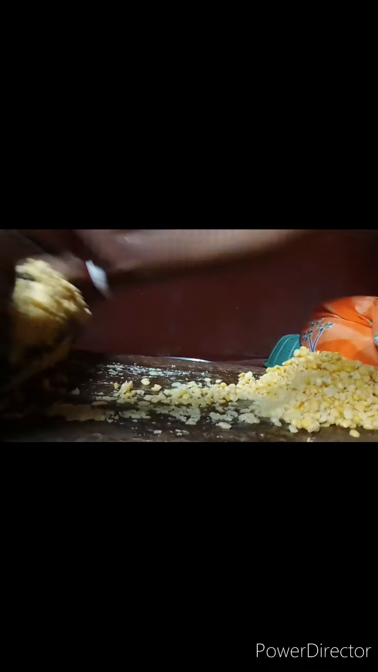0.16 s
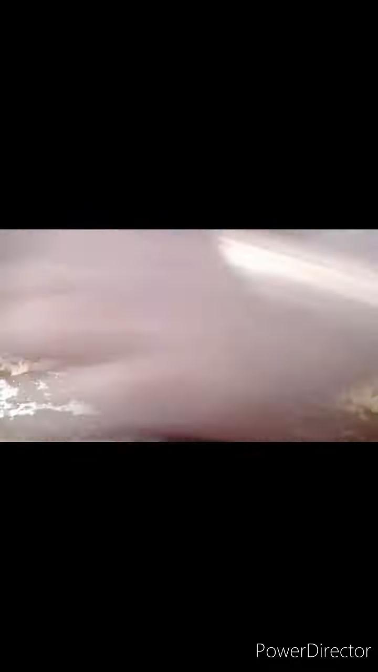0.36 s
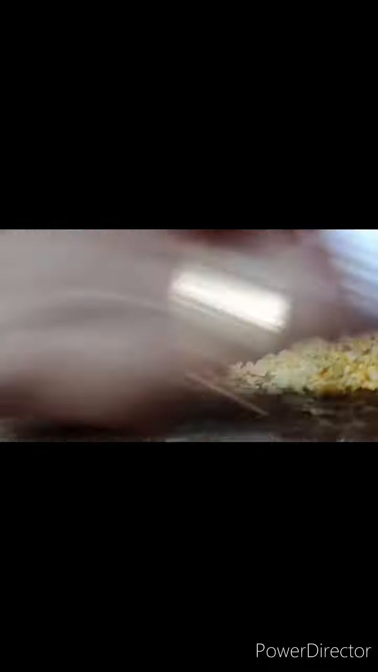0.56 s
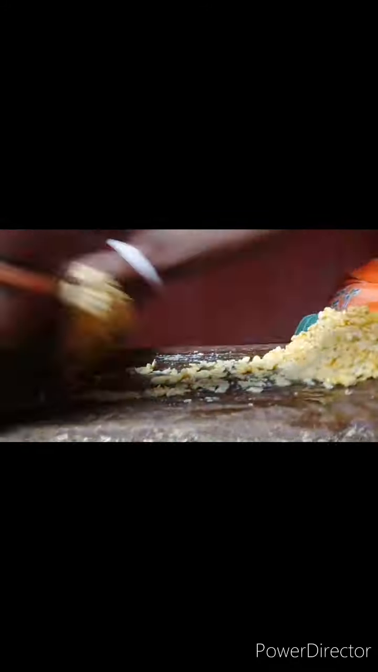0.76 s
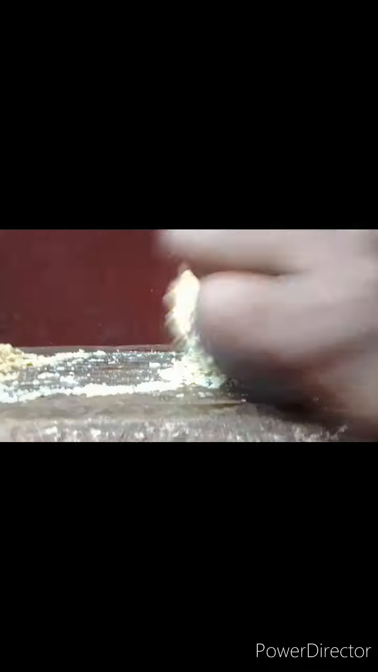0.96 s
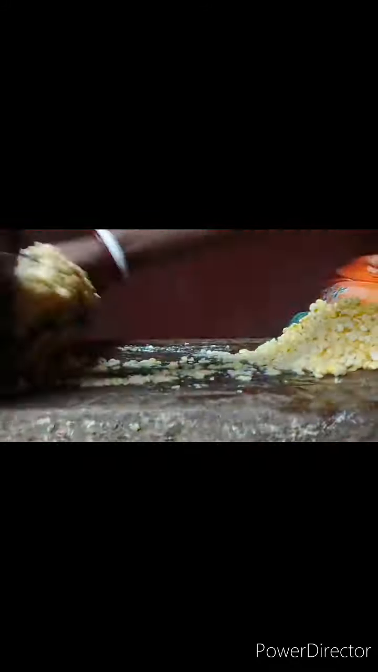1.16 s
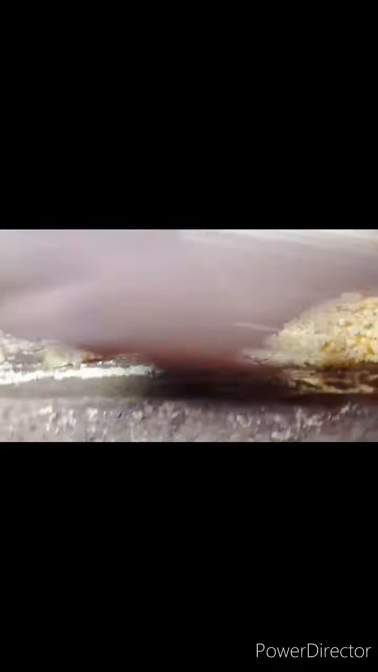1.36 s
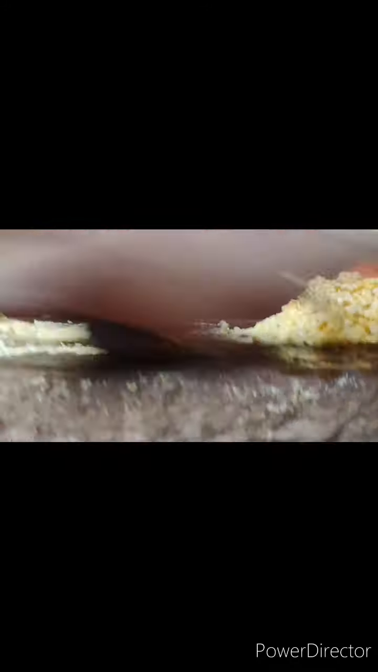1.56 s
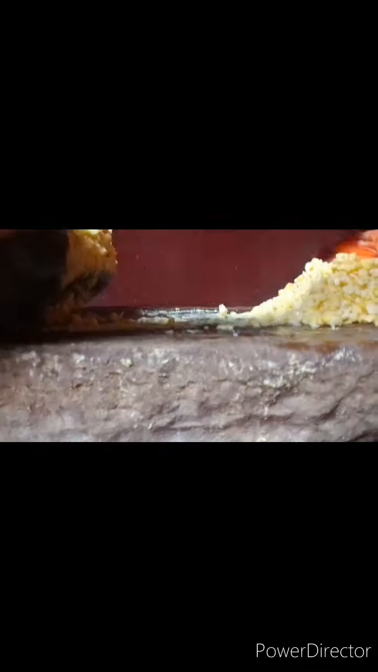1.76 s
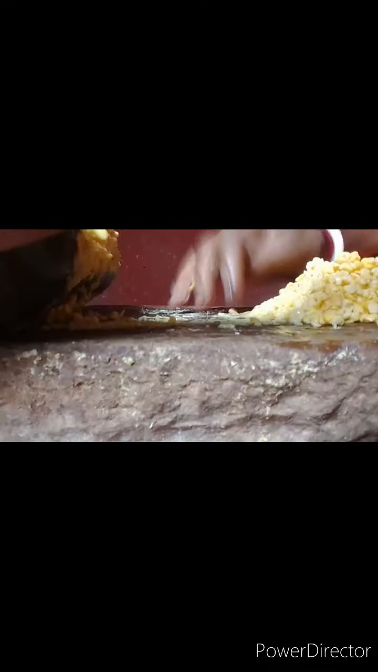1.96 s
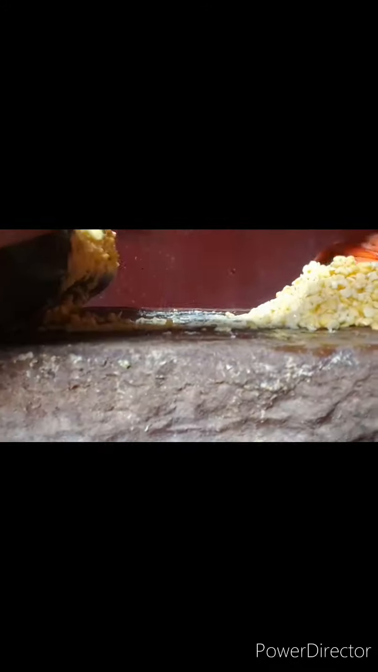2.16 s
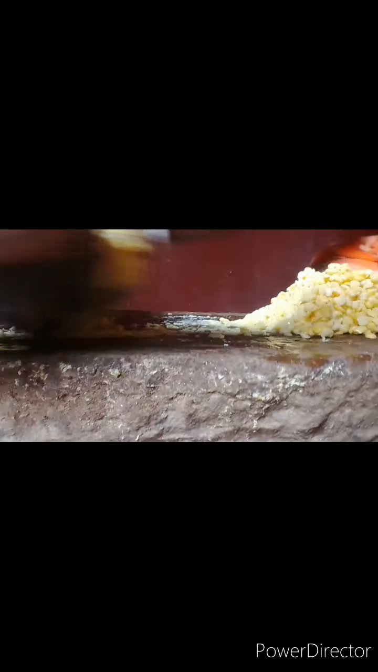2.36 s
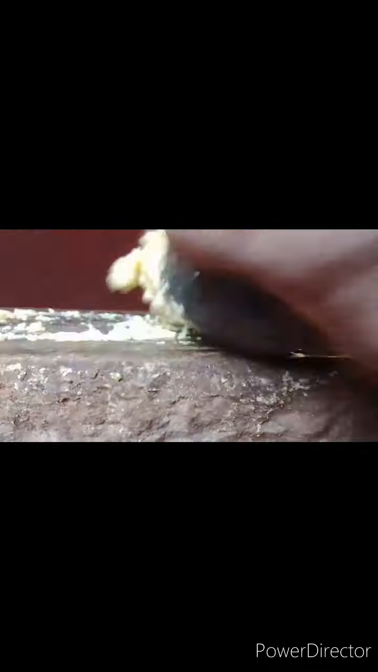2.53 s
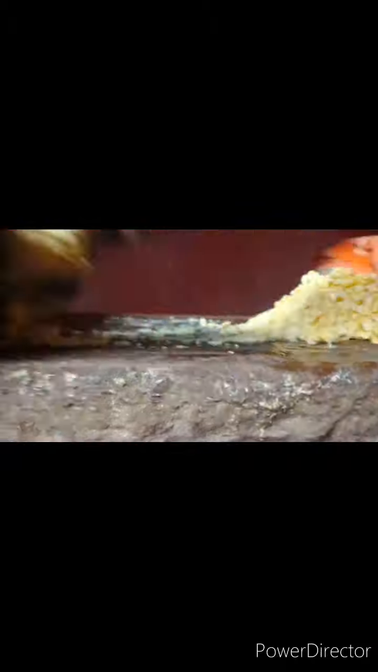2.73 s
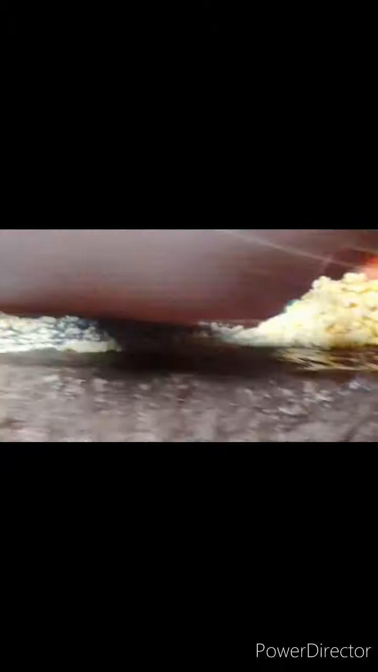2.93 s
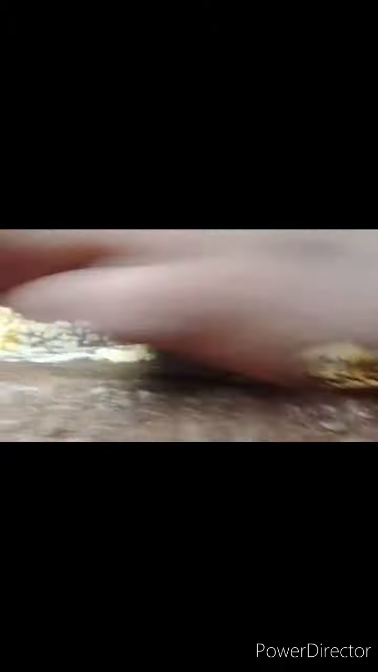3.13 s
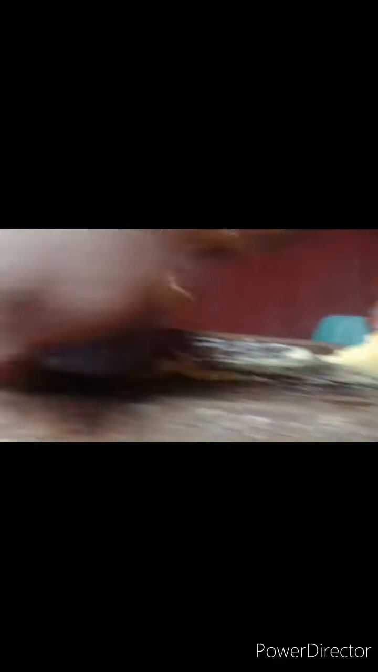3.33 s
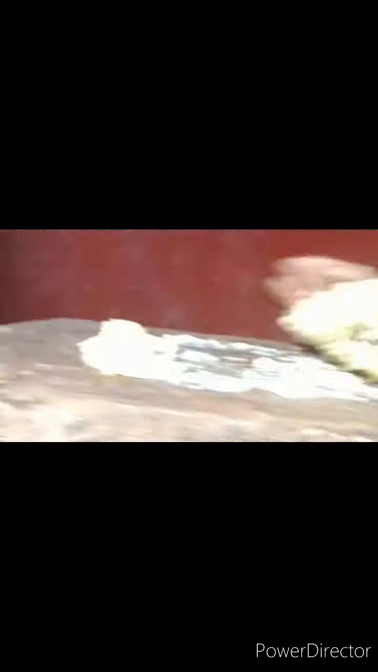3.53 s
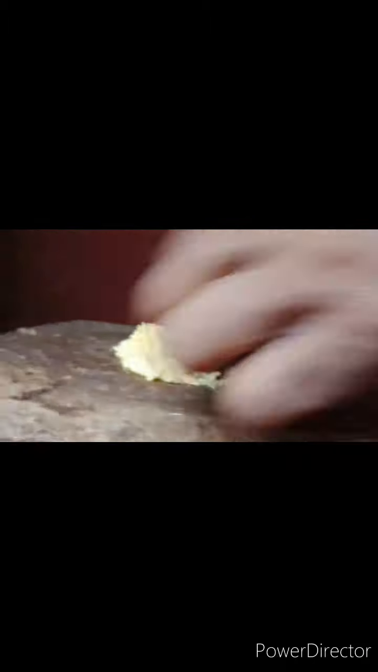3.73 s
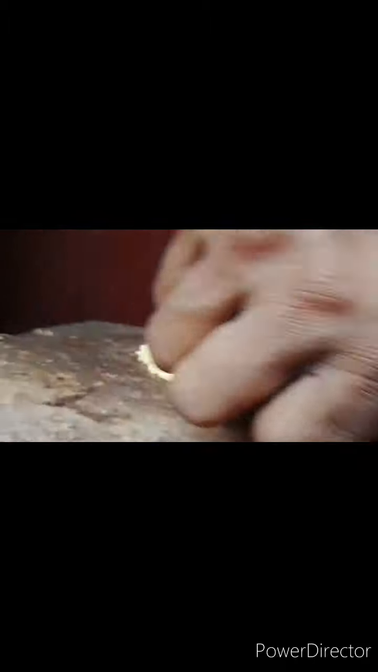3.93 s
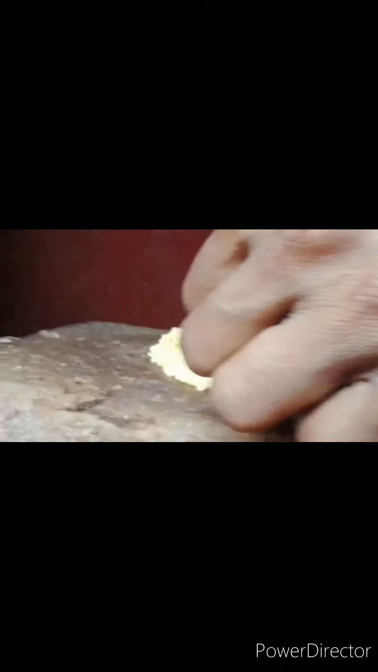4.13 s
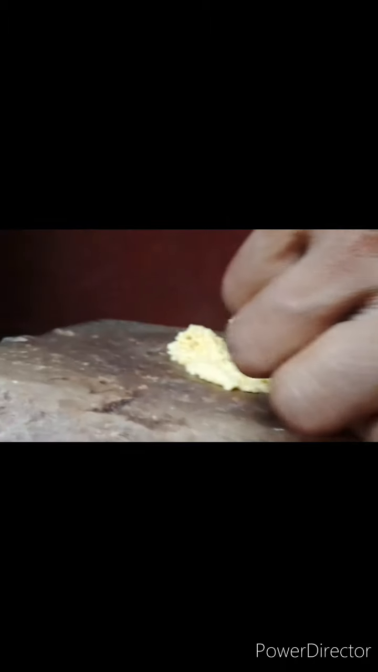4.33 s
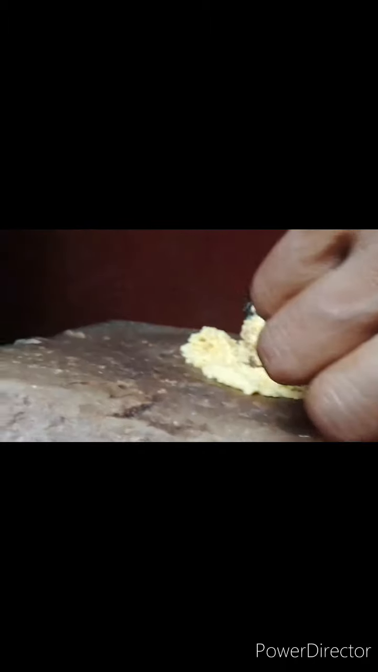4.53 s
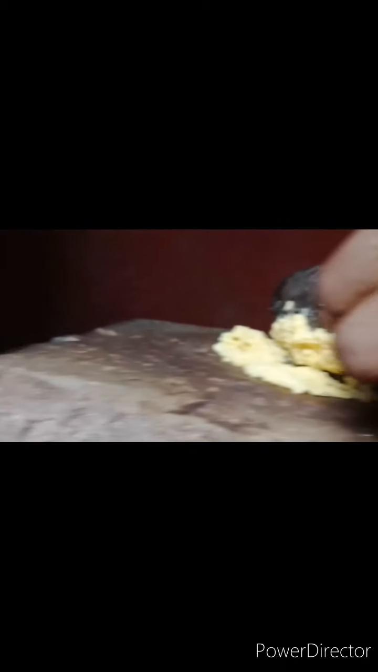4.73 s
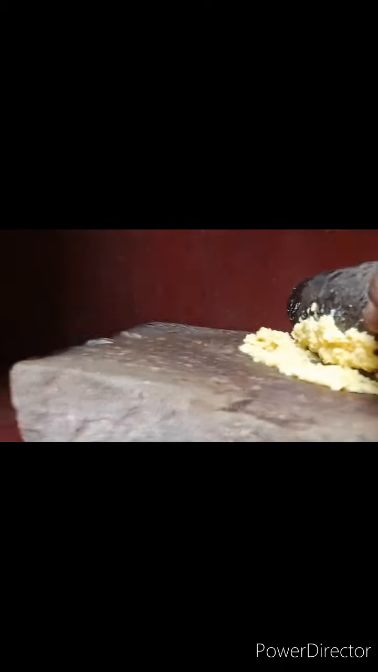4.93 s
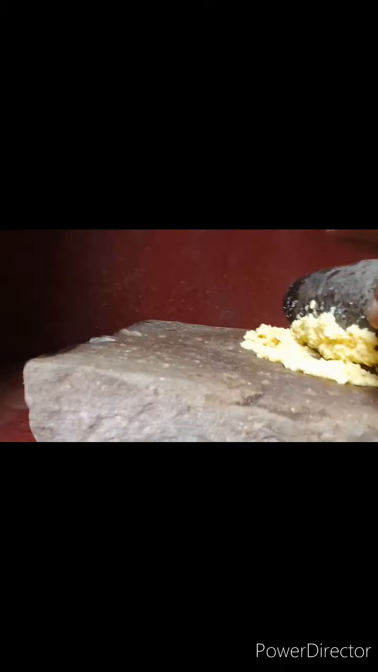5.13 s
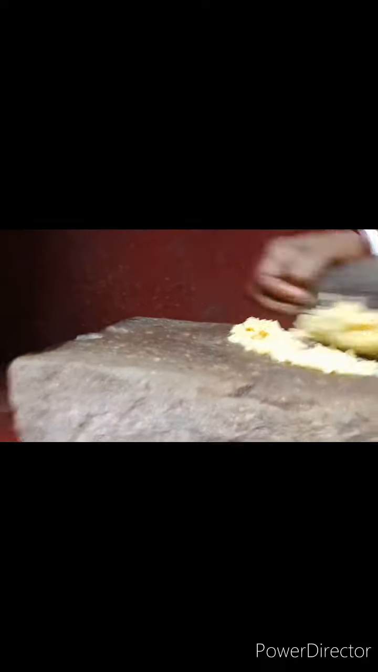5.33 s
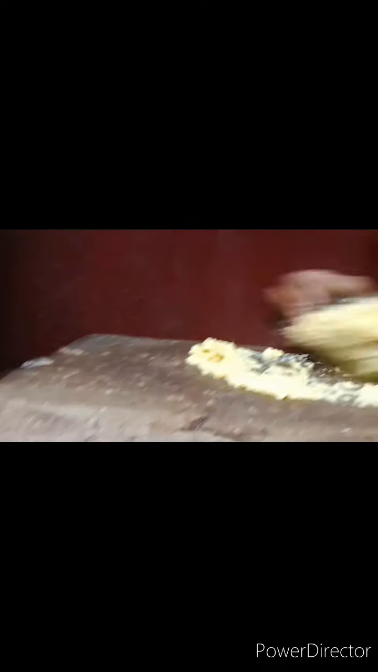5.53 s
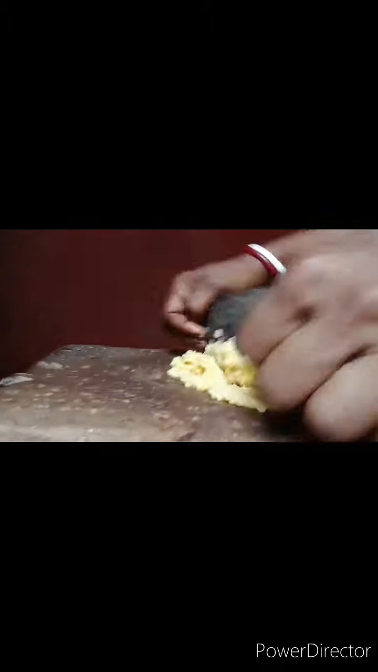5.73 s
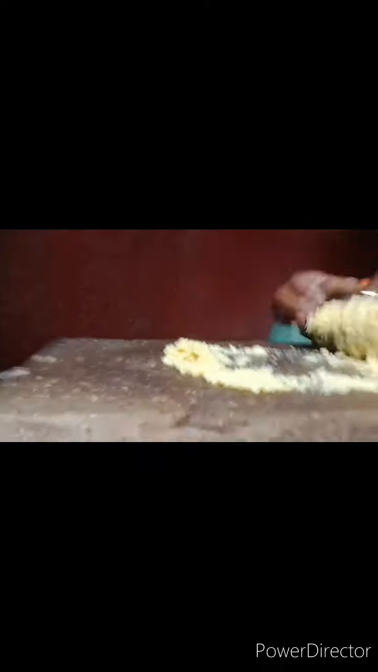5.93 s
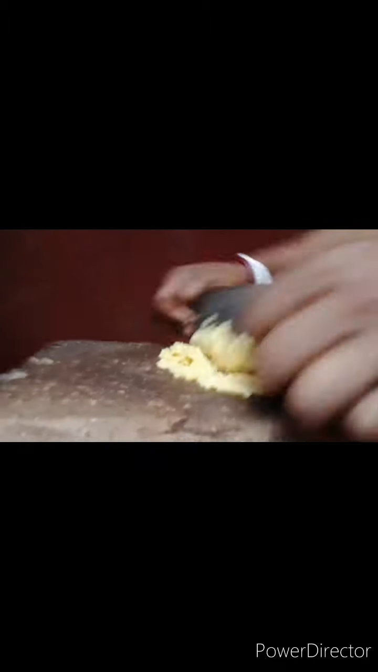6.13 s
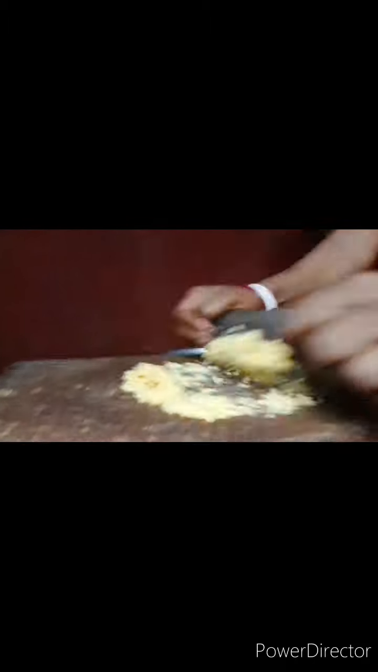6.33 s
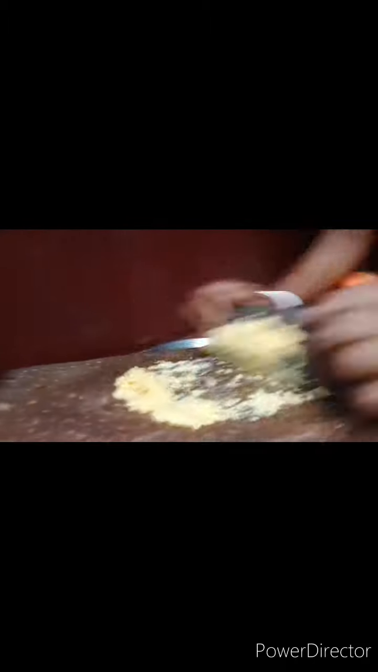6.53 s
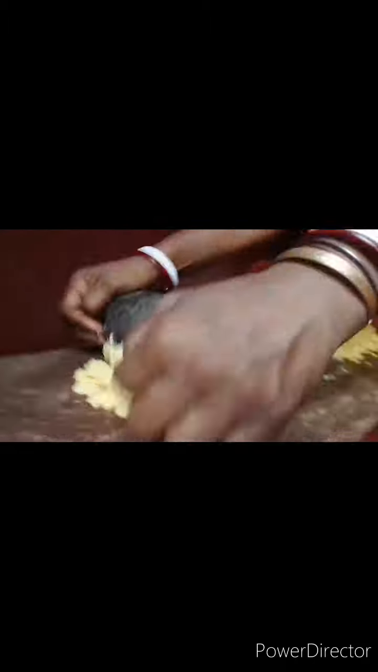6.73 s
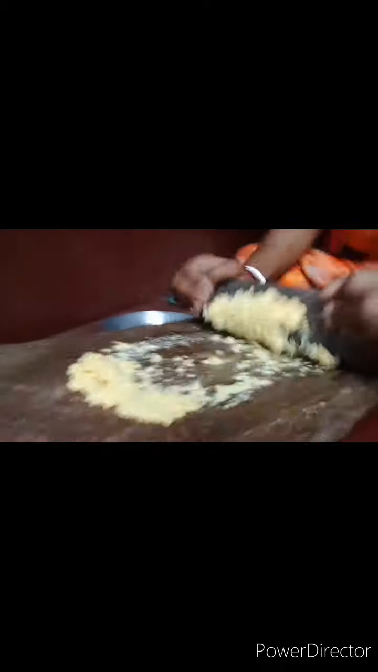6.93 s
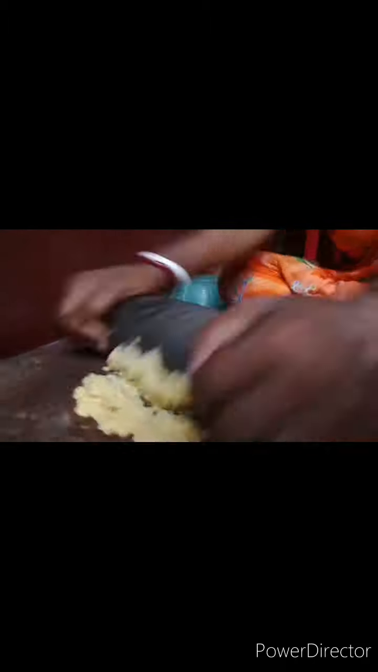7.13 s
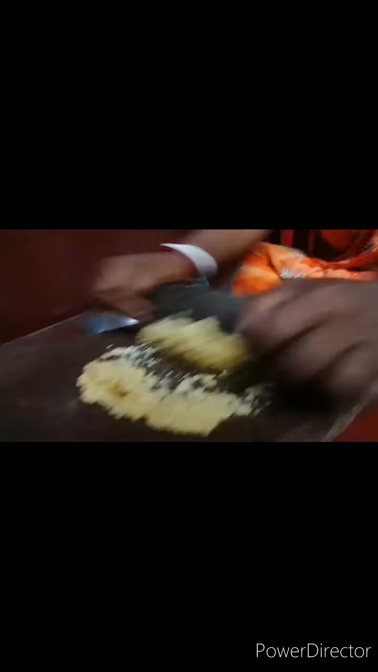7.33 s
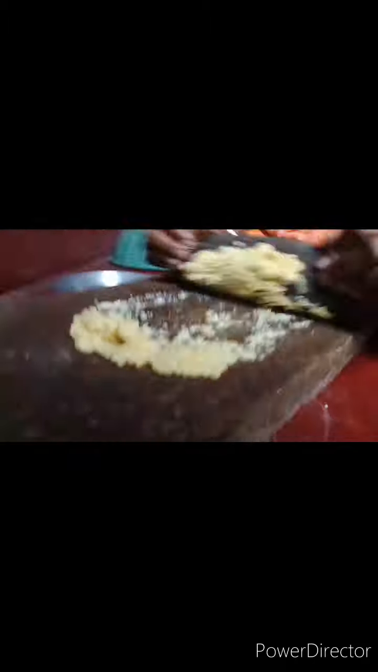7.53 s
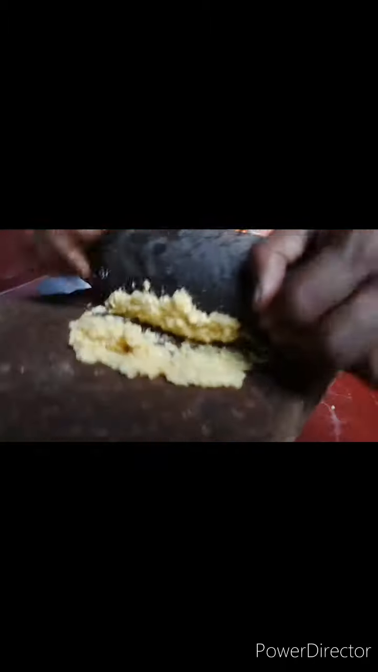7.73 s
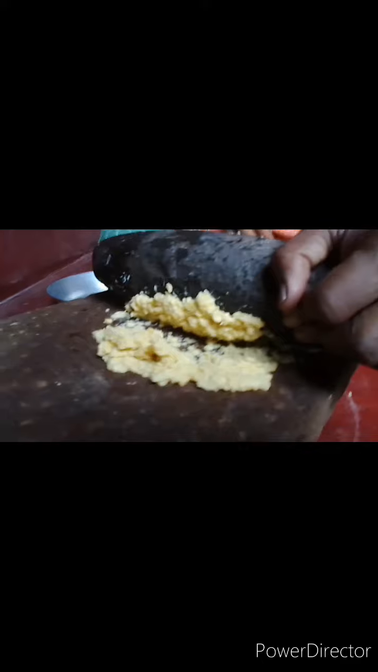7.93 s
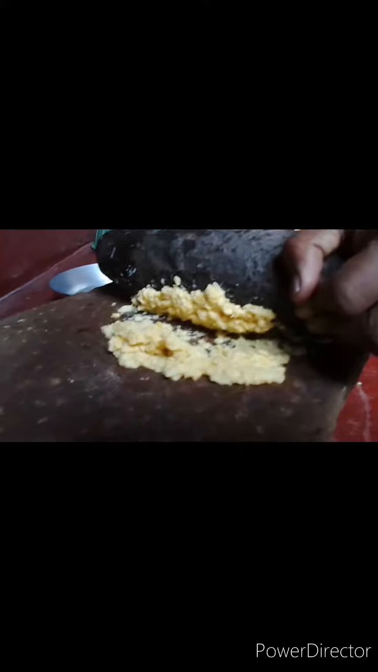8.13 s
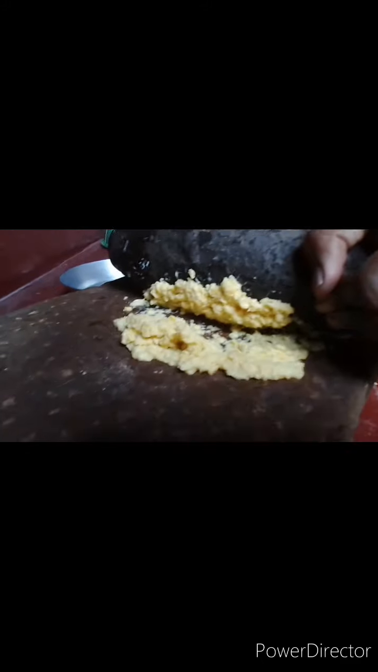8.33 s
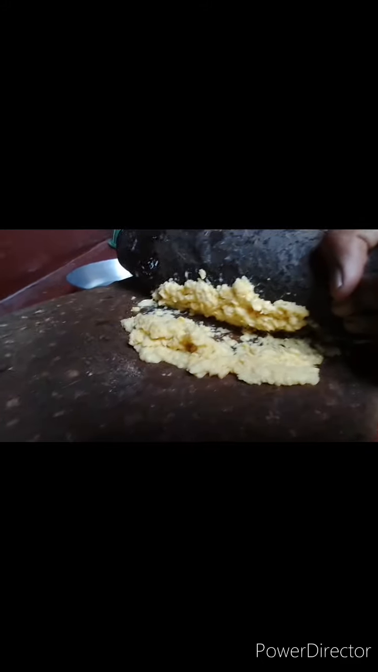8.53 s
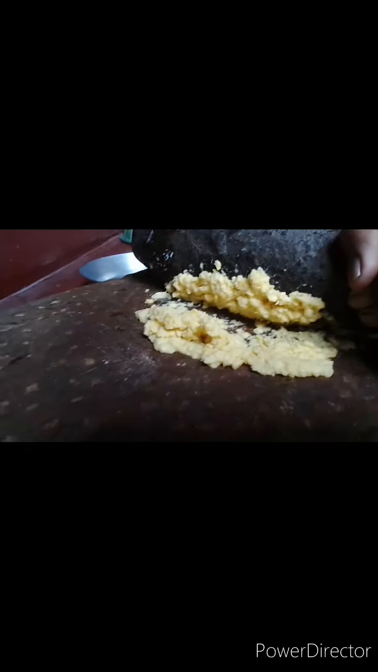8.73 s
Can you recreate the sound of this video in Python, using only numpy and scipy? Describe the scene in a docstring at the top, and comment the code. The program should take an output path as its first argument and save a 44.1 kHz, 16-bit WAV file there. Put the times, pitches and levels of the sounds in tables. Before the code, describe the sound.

A heavy stone roller grinds wet lentil paste on a stone slab, very close, in a small kitchen with short dull echoes. From 0 to 1.9 s, quick alternating strokes make bright, gritty hisses and scrapes, about four a second; the slab rocks and knocks on the floor in low, woody double thuds with rapid rebounds. Bangles clink lightly near 1.05 and 1.55 s. A short pause follows around 2 s, then from 2.5 to 3.9 s come stronger, hissier strokes with the hardest knocks near 2.7 and 3.3 s and many small crackles. From 4 to 5.3 s there is almost only quiet room noise, with faint ticks. From 5.4 to 7.8 s steady paired rubs return every half second, each with a lighter, harder stony knock. Then the grinding stops; soft airy noise remains, with a barely audible clink near 7.95 s and a small tick at 8.74 s.

```python
"""A heavy stone roller is pushed to and fro over lentil paste on a stone slab, heard close by in a small kitchen.
Frictional grains under each half stroke are bursts of noise over smooth hiss, swelling as powers of the speed.
The slab rocks and knocks on the floor in quick bounces: short contact pushes drive decaying modes.
Bangles clink as modes struck in varying shares; cracks of lentils and ticks are millisecond bursts of band noise.
Noise-tail echoes and a soft, slowly wavering room noise lie under it all."""
import sys
import numpy as np
from scipy import signal
from scipy.fft import rfft, irfft
from scipy.io import wavfile
from scipy.ndimage import uniform_filter1d

SR = 44100
rng = np.random.default_rng(int(sys.argv[2]) if len(sys.argv) > 2 else 0)


def wav_out(sig):
    """Save sig, one row per channel (or a flat mono array), as 16-bit PCM at SR to the path in sys.argv[1]."""
    wavfile.write(sys.argv[1], SR, np.round(np.clip(np.atleast_2d(sig).T, -1, 1) * 32767).astype(np.int16))


N = 391608  # length in samples


def roller():
    """Stick-slip friction: grains radiate hiss, scrape and fizz; bumps excite modes of slab and stone."""
    # half strokes; scrape and fizz levels are relative to the hiss, tilt is towards the treble:
    # fastest_s, rise_s, fall_s, hiss_db, scrape_db, fizz_db, tilt_db, rumble_db, grate_db
    half_strokes = [(0.0, .1, 0.06, -42.5, 6, -4, 0, -64, -62),
                    (0.17, 0.16, 0.18, -35, -5.5, -14.5, -2, -53, -43),
                    (0.51, 0.15, 0.069, -36, -3.5, -11.5, 0, -47, -58),
                    (0.69, 0.12, .12, -41, 1.5, -4.5, 1, -40.5, -46),
                    (0.98, 0.13, 0.13, -42, 0, -1, 5.5, -42.5, -57),
                    (1.17, 0.13, 0.24, -40.5, 0.5, -4, 2, -42, -47),
                    (1.49, 0.14, 0.11, -40, -2.5, -5, 4.5, -45, -57),
                    (1.68, 0.11, 0.15, -42.5, -0.5, -4, 4.5, -33.5, -44.5),
                    (2.36, 0.05, 0.045, -49.5, -21.5, -10.5, 2, -56, -53),
                    (2.57, 0.12, 0.11, -39, -6, -7.5, 3.5, -41, -59),
                    (2.75, 0.071, .15, -37, -4.5, -6, 2.5, -32, -43),
                    (3.08, 0.13, 0.11, -31, -15.5, -15, -0.5, -37.5, -52),
                    (3.27, 0.067, 0.15, -31, -12, -11.5, 0, -34.5, -33),
                    (3.56, 0.12, 0.23, -35, -10, -11.5, -0.5, -41.5, -62),
                    (3.77, 0.073, 0.17, -34, -10.5, -9, 0.3, -36.5, -41),
                    (5.32, .08, 0.17, -58, -4.5, -7.5, -1, -56, -68),
                    (5.54, 0.17, 0.12, -35, -10.5, -10, -1, -65, -70),
                    (5.68, 0.064, .15, -34, -8.5, -14.5, 1.5, -49, -58),
                    (5.94, .07, 0.073, -40.5, -6, -8.5, 2, -60, -66),
                    (6.045, 0.074, 0.049, -30.5, -7, -11, 0, -49, -62),
                    (6.17, 0.073, 0.15, -33, -7, -8, 1, -42.5, -50),
                    (6.53, .16, 0.087, -34, -8, -17, 2, -60, -54),
                    (6.68, 0.096, 0.15, -37, -10.5, -11.5, 4.5, -52, -49),
                    (7.04, 0.18, 0.066, -34, -10.5, -12, 2, -65, -60),
                    (7.21, 0.19, 0.11, -36, -12.5, -13, 0, -44, -47),
                    (7.56, 0.22, 0.095, -32.5, -14, -13, -0.5, -53, -60),
                    (7.7, 0.15, 0.12, -33, -14, -14, 1, -42, -44)]
    # noise spectra of hiss, scrape and fizz as the microphone hears them,
    # its own resonance near 7 kHz included: frequency_hz, density_db
    hiss_spectrum = [(4000, -52), (5200, -15), (6200, -1), (7300, 0), (8600, -16.5), (10000, -27.5),
                     (11500, -12)]
    scrape_spectrum = [(1500, -6), (2300, -4), (3500, 3.5), (4600, 3), (5800, -1), (6800, 0)]
    fizz_spectrum = [(7500, -17), (8800, -9), (10200, -11.5), (12500, -16.5), (14800, -22), (16000, -25)]
    # order of the layers: hiss, scrape, fizz, rumble, grate
    speed_powers = [1.55, 1.36, 1.57, 1, 4.5]
    lags_s = [0, 0, 0, 0.054, -0.023]  # the slab wobbles on late; the stone bites early
    t = np.arange(N) / SR
    envelopes = np.zeros((5, N))
    for fastest_s, rise_s, fall_s, hiss_db, scrape_db, fizz_db, _, rumble_db, grate_db in half_strokes:
        near = slice(max(int((fastest_s - .5) * SR), 0), int((fastest_s + .5) * SR))
        levels_db = [hiss_db, hiss_db + scrape_db, hiss_db + fizz_db, rumble_db, grate_db]
        for k, db in enumerate(levels_db):
            motion = speed(t[near] - lags_s[k], fastest_s, rise_s, fall_s)
            stroke = undb(db) * motion ** speed_powers[k]
            envelopes[k, near] = np.maximum(envelopes[k, near], stroke)

    bed = grit(rate=1800, spread_db=2.5, smooth=0.74) * undb(2.7 * walk(45))
    coarse = grit(rate=550, spread_db=8.5, smooth=0.96)
    hiss = colour(bed, hiss_spectrum) * undb(0.6 * walk(18))
    # opposite gains on two overlapping bands tilt the hiss
    tilt_db = np.interp(t, *np.transpose(half_strokes)[[0, 6]])
    lower = undb(-tilt_db) * band(hiss, 3340, 7080)
    upper = undb(tilt_db) * band(hiss, 6330, 10800)
    hiss = lower + upper
    scrape = colour(0.65 * bed + coarse, scrape_spectrum) * undb(1.5 * walk(18))
    snaps = grit(rate=37, spread_db=10.0, smooth=.1)  # lone hard grains give way
    fizz = colour(bed + .5 * snaps, fizz_spectrum)

    bumps = grit(rate=500, spread_db=-5.5, smooth=2.6)
    rumble = unit(slab_ring(uniform_filter1d(bumps, size=40)))
    grate = unit(stone_ring(uniform_filter1d(bumps, size=9)))
    return (envelopes * [hiss, scrape, fizz, rumble, grate]).sum(axis=0)


def speed(t, fastest, rise, fall):
    """Stroke kinematics: a 0-1 bell of relative speed, squarer on its quicker flank."""
    rise, fall = max(rise, .01), max(fall, .01)
    span = np.where(t < fastest, rise, fall)
    squareness = np.where(span == max(rise, fall), 1.84, 2.86)
    return np.exp(-1.5 * np.abs((t - fastest) / span) ** squareness)


def grit(rate, spread_db, smooth):
    """Granular friction as shot noise: random uneven bursts, rate a second, over smooth rubbing noise."""
    sizes = np.minimum(rng.exponential(1, N), 3.5)
    grains = (rng.random(N) < rate / SR) * undb(spread_db * sizes)
    bursts = signal.lfilter([1], [1, -.9], grains) * rng.standard_normal(N)
    return unit(bursts) + smooth * rng.standard_normal(N)


def slab():
    """Impact and rebound: finite contact pushes ring the slab, ever weaker and mostly softer, at two corners."""
    # the slab rocks onto the floor; contact is that of the second corner's first landing, flight the first one,
    # flight_ratio each flight over the one before, loss that of the first bounce; the second corner lands late:
    # start_s, level_db, contact_ms, stone_db, flight_ms, flight_ratio, loss_db, corner_lag_ms, corner_db
    rocks = [(0.12, -15, 1.36, -20, 19, .7, 12, 5.5, -3), (0.153, -15.5, 1.5, -13, 17.7, .7, 7, 6.3, 5.5),
             (0.2976, -24.5, 3, -7, 16, .7, 30, 5.3, -30), (0.3125, -33.5, 1.8, 1, 28, 0.99, 25, 7, -35.5),
             (0.641, -11.5, 1.25, -11.5, 28, 0.98, 4.5, 6.53, 5),
             (1.0911, -15.5, 3.6, -18, 28, .7, 25, 7, -30), (1.1528, -11, 1.53, -17, 19.8, 1.15, 8, 6, 4),
             (1.5639, -8, 1.64, -24, 28, .7, 35, 5.2, -5.5), (1.636, -24, 1.3, -22, 28, .7, 25, 7, -30),
             (1.6568, -8, 1.23, -12, 27.4, .74, 6.5, 8.16, 6.5),
             (2.6046, -14, 1.8, -9.5, 15.2, 0.6, 15, 5.5, -20), (2.7158, -25, 1.3, -22, 26, .7, 32, 7, -30),
             (2.7382, -4, 1.17, -8, 25.3, .62, 7, 8.5, 3), (3.2365, -26, 1.1, -15, 28, .7, 25, 7, -30),
             (3.2563, -3.5, 1.14, -11.5, 27.5, 0.94, 5.5, 8.83, -1.5),
             (3.76, -9, 1.14, -19, 26.2, 0.76, 6.5, 8, 4), (5.0736, -35.5, 1.5, -10, 28, .7, 25, 7, -30),
             (5.6517, -16, 0.99, -14, 26.9, 0.59, 2, 5.26, -8),
             (6.157, -12.5, 0.87, -4.5, 29.3, .7, 2.5, 7.4, -12),
             (6.662, -14.5, 1.08, -1.5, 28.2, 0.65, 2.5, 6.5, -19.5),
             (7.1768, -14.5, 0.93, -4.5, 29.1, 0.7, 2.3, 8, -8),
             (7.6815, -15.5, 0.74, -4, 34, .66, 1.5, 6.7, -15)]
    bounces = 6
    softening = 1.217  # contact time of each bounce over the one before
    loss_power = 1.29  # the loss mounts as the bounce number to this power
    push, sharp = np.zeros(N), np.zeros(N)
    scatter = rng.standard_normal((len(rocks), bounces, 2))
    for rock, chance in zip(rocks, scatter):
        s, db, contact_ms, stone_db, flight_ms, flight_ratio, loss_db, corner_lag_ms, corner_db = rock
        # of a pair, the first corner rings the stone less; it always touches longer
        first_stone_db = -8.5 if corner_db > -20 else 0
        corners = [(0, 0, first_stone_db, 1.13), (corner_lag_ms, corner_db, 0, 1)]
        for k in range(bounces):
            for (late_ms, rel_db, ring_db, longer), uneven in zip(corners, chance[k]):
                touch_ms = max(contact_ms * longer * softening ** k, .3)
                shape = np.hanning(int(touch_ms * SR / 1000) + 2)
                i = int((s + late_ms / 1000) * SR)
                gain = undb(db + rel_db - k ** loss_power * loss_db)
                push[i:i + len(shape)] += gain * shape / shape.sum()
                sharp[i] += gain * undb(stone_db + ring_db + 3.0 * uneven)  # the stone rings unevenly
            s += flight_ms / 1000
            flight_ms *= flight_ratio
    soft = uniform_filter1d(uniform_filter1d(sharp, size=12), size=12)
    return slab_ring(push) + stone_ring(soft)


def slab_ring(force):
    """Modal superposition: the listening place sets each mode's share and sign."""
    # modes of the slab on the floor, shares signed, at two microphone places:
    # frequency_hz, t60_s, first_share, second_share
    slab_modes = [(113.6, 0.2, -0.03, -0.14), (154.3, 0.53, -0.03, -0.11), (169, 0.029, -0.74, 0.067),
                  (204, 0.014, 0.48, 0.0084), (237, 0.7, -0.026, 0.0039), (264.8, 0.55, 0.032, 0.027),
                  (306.5, 0.47, 0.078, 0.069), (349, 0.073, 0.16, 0.23), (367, 0.13, 0.067, 0.01),
                  (462, 0.033, -0.04, -0.12), (458.8, 0.022, 0.56, 1.17), (462, 0.23, 0.13, 0.31),
                  (562, 0.0097, 0.93, 1.72), (634, 0.032, 0.09, 0.21), (679, 0.024, 0.19, -0.2),
                  (743, 0.021, -0.07, 1.06), (795, 0.034, -0.32, -0.75), (966, 0.014, -0.43, -0.19)]
    moved = np.arange(N) > 4.5 * SR  # the microphone is at its second place after 4.5 s
    return sum(np.where(moved, second, first) * ring(force, hz, t60) for hz, t60, first, second in slab_modes)


def stone_ring(force):
    """Bending vibration: the stiff stone's own modes add as decaying sines."""
    # bending modes of the stone: frequency_hz, level_db, t60_s
    stone_modes = [(1388, 0, 0.038), (1733, -3.5, 0.034), (1175, -28, 0.034)]
    return sum(undb(db) * ring(force, hz, t60) for hz, db, t60 in stone_modes)


def cracks_and_ticks():
    """Impulsive release: each crack or tick is a rapidly decaying noise burst around its own pitch."""
    # loud short cracks and ticks: lentils under the roller, the first one probably a bangle clink:
    # start_s, level_db, pitch_hz
    short_bursts = [(0.0923, -16.5, 4500), (0.121, -18.5, 6200), (0.297, -27.5, 2900), (0.306, -30, 2600),
                    (0.6775, -19, 4630), (0.7462, -30, 2850), (0.8325, -30, 8400), (1.0137, -21, 9250),
                    (1.1, -16.5, 5300), (1.1628, -12.5, 7650), (1.187, -18, 3840), (1.286, -39, 5500),
                    (1.6925, -18.5, 4300), (1.786, -29, 3900), (2.565, -19.5, 7860), (2.617, -19, 9300),
                    (2.723, -30, 6850), (2.758, -19, 7000), (2.835, -29, 3370), (2.914, -32, 7700),
                    (2.9903, -20, 6400), (3.0034, -27, 6320), (3.0121, -28, 6640), (3.059, -17, 6460),
                    (3.1316, -21, 8000), (3.2314, -32, 7050), (3.271, -24, 6800), (3.318, -29, 2950),
                    (3.691, -30, 6510), (3.748, -19, 6670), (3.7687, -16.5, 7810), (3.806, -19, 7000),
                    (3.831, -21, 6440), (4.4826, -38, 6040), (4.7331, -35, 5490), (5.358, -31, 7450),
                    (5.3927, -30, 7040), (5.6346, -24, 6840), (5.67, -22, 6700), (5.692, -21, 3380),
                    (5.7283, -21, 6900), (6.0365, -11.5, 7000), (6.208, -24, 6500), (6.387, -31, 6140),
                    (6.475, -39, 6600), (6.549, -18, 7000), (6.6724, -17, 6750), (6.8134, -36, 7330),
                    (6.8823, -30, 6740), (7.201, -22, 7100), (7.3516, -34, 6400), (7.442, -28, 5960),
                    (7.552, -14.5, 7200), (8.744, -26.5, 6760)]
    out, t = np.zeros(N), np.arange(256) / SR
    for (s, db, hz), noise in zip(short_bursts, rng.standard_normal((len(short_bursts), 256))):
        burst = noise * np.exp(-t / .0009)
        for _ in range(2):
            burst = band(burst, 0.74 * hz, 1.26 * hz)
        i = int(s * SR)
        out[i:i + 256] += undb(db + 0.5) * burst / np.abs(burst).max()
    return out


def bangles():
    """Modal excitation: each clink shares its blow differently among ring modes, with a short contact scratch."""
    # clinks of the bangles on the wrists; mode levels are relative to the third ring mode:
    # start_s, level_db, first_db, second_db, fourth_db, thin_bangle_db
    clinks = [(1.05, -17.5, 3.5, -9.5, -23, -10), (1.075, -38, 18.5, -12, -20, 11),
              (1.5489, -15.5, -2, -10, -21, -4), (2.64, -24, -29, -1.5, -17, 2),
              (3.1556, -17.5, -29, -10, -6, -16), (5.5919, -21, -63, -6.5, 4, -10),
              (6.1484, -23, -23, -17, -3, -9), (7.9512, -43.5, -14, -14, 1, 13.5)]
    # third, first, second and fourth ring mode, then a thinner bangle: frequency_hz, t60_s
    bangle_modes = [(8450, .022), (1765, .032), (4460, .022), (13000, .025), (10300, .015)]
    s, db, *rel_db = np.transpose(clinks)
    contact = signal.lfilter([1], [1, -.975], blows(s, undb(db)))
    scratch = contact * rng.standard_normal(N)
    out = band(scratch, 4000, 15000)
    for (hz, t60), mode_db in zip(bangle_modes, [0 * db] + rel_db):
        out += ring(blows(s, undb(db + mode_db)), hz, t60)
    return out


def kitchen(x):
    """Diffuse reverberation: dense echoes of bare walls as decaying noise, the treble dying faster."""
    split_hz = 800
    t = np.arange(SR // 2) / SR
    noise = rng.standard_normal((2, len(t)))
    low = band(noise[0], 145, split_hz) * np.exp(-np.log(1000) * t / 0.22)  # t60 in s
    high = undb(8.5) * band(noise[1], split_hz, 5500) * np.exp(-np.log(1000) * t / 0.028)
    tail = (low + high) * np.minimum(t / 0.012, 1)  # the echoes build up over 12 ms
    return undb(-29) * signal.fftconvolve(x, tail)[:N]


def room_noise():
    """Broadband ambience: air and far household noise as shaped noise whose bands waver a little."""
    # spectrum of the room noise: frequency_hz, density_db
    room_spectrum = [(25, -2), (60, 3), (110, -2.5), (170, -1.5), (210, 3), (300, -3.5), (420, -8),
                     (600, -8.5), (1000, -11), (1600, -12), (2300, -17.5), (4000, -25), (6800, -32),
                     (11000, -38.5), (15500, -40)]
    # the microphone is carried round the slab: time_s, room_db, mid_lift_db, treble_lift_db
    mic_path = [(0, -42, -0.5, 1), (2.1, -43, -2, 5.5), (4.1, -42.5, -1.5, 7.5), (5.1, -44, -1.5, 9),
                (7.9, -46, 4.5, 14.5), (8.248, -45.5, 2.5, 13), (8.45, -45, 5, 16), (8.6, -46, 5, 11),
                (8.88, -44.5, 3.5, 11.5)]
    s, *columns = np.transpose(mic_path)
    db, mid_db, top_db = (np.interp(np.arange(N) / SR, s, c) for c in columns)
    air = colour(rng.standard_normal(N), room_spectrum)
    # filtering forwards and backwards keeps the phase, so the bands can be subtracted
    mid, top = (band(band(air, lo, hi)[::-1], lo, hi)[::-1] for lo, hi in [(750, 3240), (5400, 9100)])
    rest = (air - mid - top) * undb(0.9 * walk(4.9))
    mid = mid * undb(mid_db + 1.05 * walk(3.21))
    top = top * undb(top_db + 0.21 * walk(2.6))
    return undb(db) * (rest + mid + top)


def undb(db):
    """Decibel law: amplitude gain of a level in dB."""
    return 10 ** (np.asarray(db) / 20)


def unit(x):
    """Power normalisation: scale to rms 1."""
    return x / np.sqrt(np.mean(x ** 2))


def colour(x, spectrum):
    """Spectral shaping: weight a noise by (Hz, dB) points on a log frequency axis, to rms 1."""
    hz, db = np.transpose(spectrum)
    bins = np.log(np.fft.rfftfreq(N, 1 / SR) + 1)
    gain = undb(np.interp(bins, np.log(hz), db, -90, -90))
    return unit(irfft(rfft(x) * gain, N))


def ring(x, hz, t60):
    """Damped resonance: a complex pole turns each blow into a decaying sine."""
    pole = np.exp(2j * np.pi * hz / SR - np.log(1000) / (t60 * SR))
    return signal.lfilter([1], [1, -pole], x).imag


def band(x, lo_hz, hi_hz):
    """Band limitation: gentle Butterworth band-pass."""
    return signal.sosfilt(signal.butter(2, [lo_hz, hi_hz], "band", fs=SR, output="sos"), x)


def walk(rate):
    """Slow random modulation: levels drawn rate times a second, smoothed twice, to rms 1."""
    k = int(SR / rate)
    steps = np.repeat(rng.standard_normal(N // k + 1), k)
    return unit(uniform_filter1d(uniform_filter1d(steps, k), k)[:N])


def blows(times, gains):
    """Ideal impulses: one-sample clicks of the given gains at the given moments in s."""
    out = np.zeros(N)
    np.add.at(out, (np.asarray(times) * SR).astype(int), gains)
    return out


def scene():
    """Linear superposition: all sources, their echoes and the room noise add."""
    near = roller() + slab() + cracks_and_ticks() + bangles()
    return (near + kitchen(near) + room_noise())[None]


def record(dry):
    """Soft saturation and band limits: the microphone rounds loud peaks, drops deep bass and cuts the top."""
    rounded = np.tanh(.9 * dry) / .9
    thin = signal.sosfilt(signal.butter(4, 98, "high", fs=SR, output="sos"), rounded)
    return signal.sosfilt(signal.ellip(10, .2, 60, 15600, fs=SR, output="sos"), thin)


dry = scene()
out = record(dry)
wav_out(out)
```